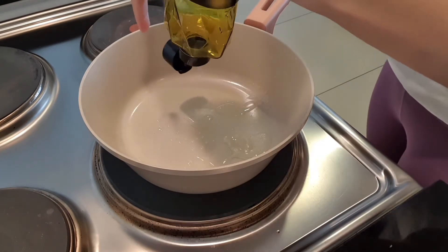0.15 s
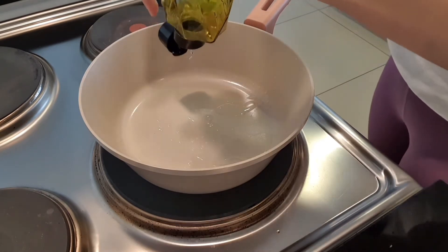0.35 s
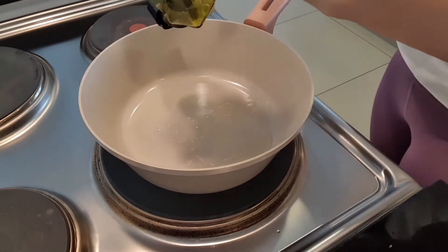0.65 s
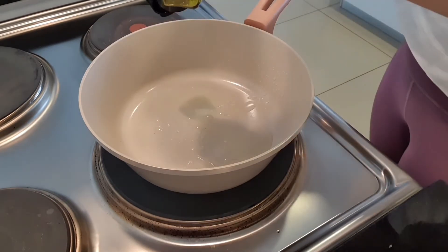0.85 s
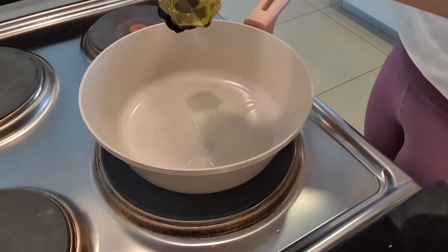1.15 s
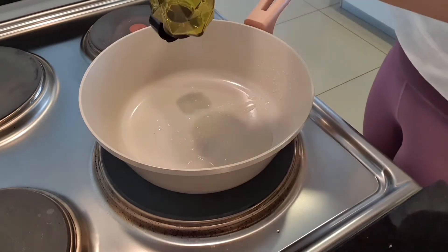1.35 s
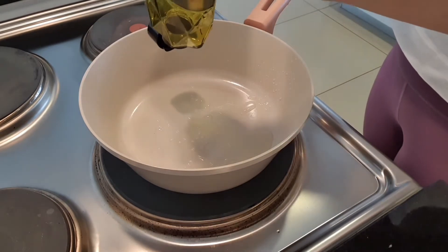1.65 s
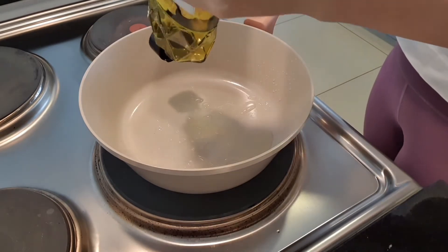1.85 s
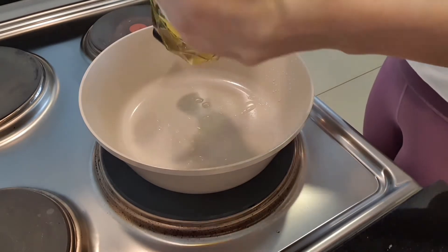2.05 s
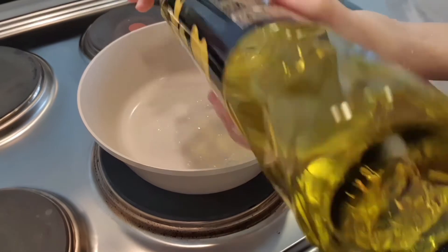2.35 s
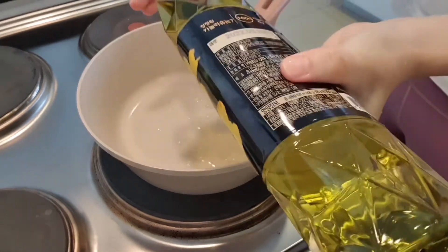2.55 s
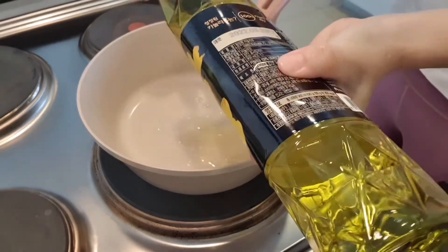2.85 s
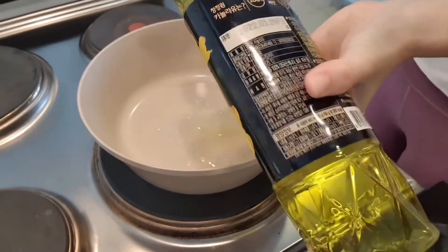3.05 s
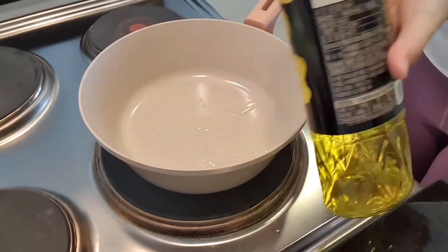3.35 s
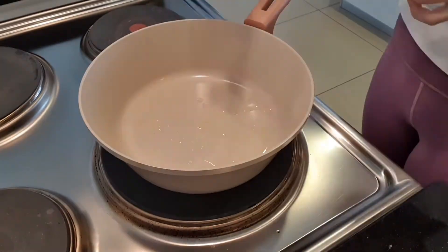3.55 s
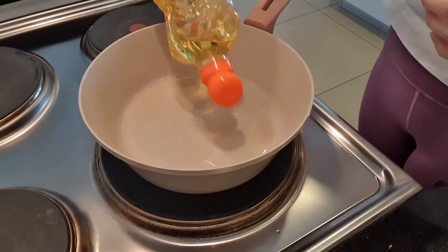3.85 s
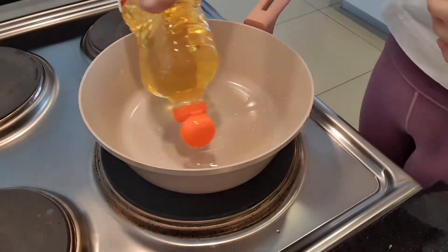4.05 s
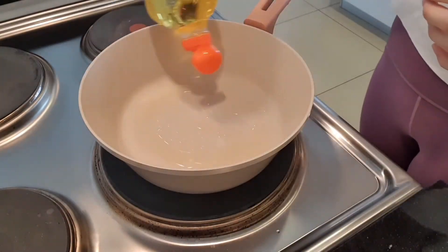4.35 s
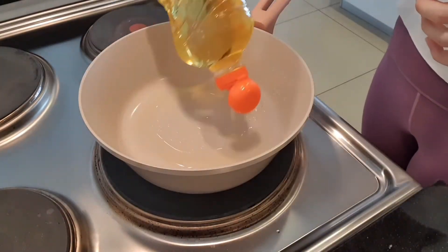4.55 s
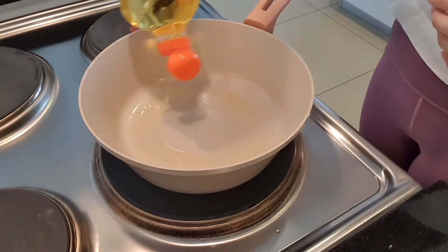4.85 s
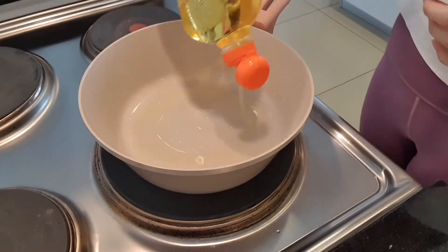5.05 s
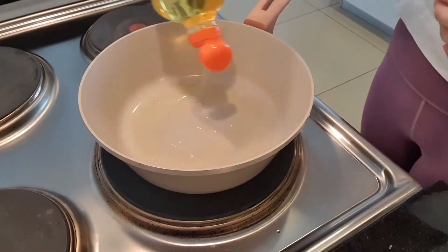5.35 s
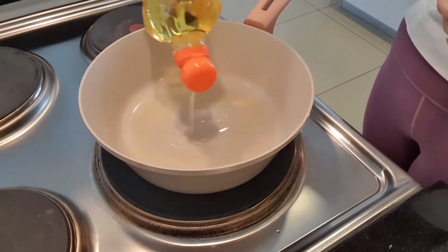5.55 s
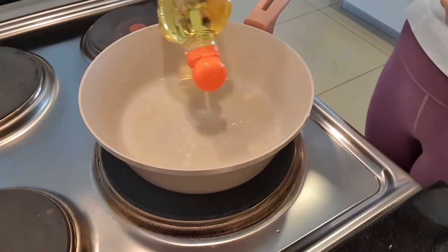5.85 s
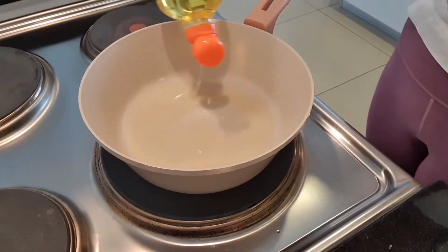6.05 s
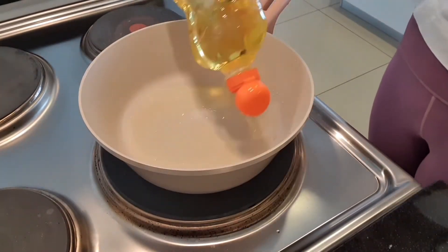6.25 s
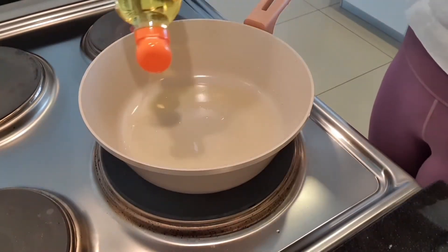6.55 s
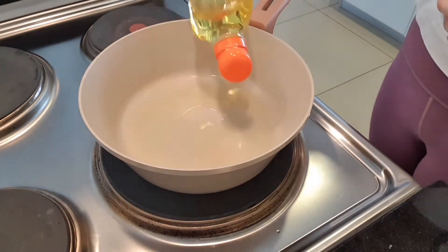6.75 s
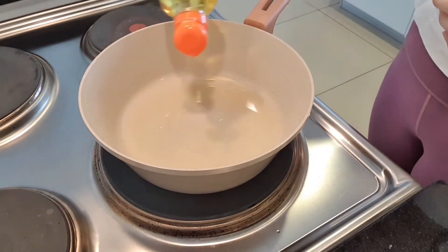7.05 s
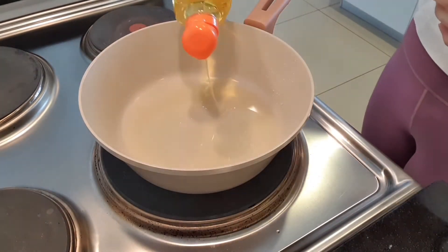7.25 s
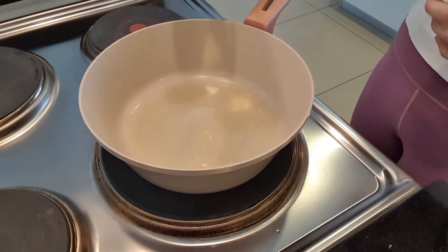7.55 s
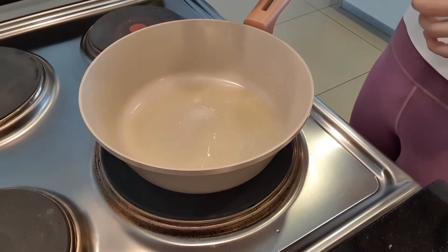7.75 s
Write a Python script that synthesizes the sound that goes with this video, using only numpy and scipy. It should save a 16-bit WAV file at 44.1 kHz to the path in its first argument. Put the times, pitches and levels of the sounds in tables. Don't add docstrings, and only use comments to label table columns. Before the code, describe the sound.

Gritty sliding and heavy wooden knocks with bottle clunks, then a quiet stretch of soft oil glugs and plastic ticks, ending in a short rattle.

```python
import sys
import numpy as np
from scipy import signal
from scipy.fft import rfft, irfft
from scipy.io import wavfile
from scipy.ndimage import uniform_filter1d

SR = 44100
rng = np.random.default_rng(int(sys.argv[2]) if len(sys.argv) > 2 else 0)


def gain_from_db(level_db):
    decades = np.asarray(level_db, float) / 20
    return 10 ** decades


def digitize_waveform(pressure):
    field = np.atleast_2d(pressure).T
    bounded = np.clip(field, -1, 1)
    quanta = np.round(bounded * 32767).astype(np.int16)
    wavfile.write(sys.argv[1], SR, quanta)


N = 348390
T = np.arange(N) / SR


def unit(x):
    return x / np.sqrt(np.mean(x ** 2))


def resonance(size, hz, width_hz):
    f = np.maximum(np.arange(size // 2 + 1) * SR / size, 1)
    return 1 / (1 + 1j * (f - hz ** 2 / f) / width_hz)


def band(x, lo_hz, hi_hz):
    mid, width = np.sqrt(lo_hz * hi_hz), hi_hz - lo_hz
    lower = resonance(len(x), np.sqrt(lo_hz * mid), width)
    upper = resonance(len(x), np.sqrt(hi_hz * mid), width)
    return irfft(rfft(x) * (lower * upper) ** 2, len(x))


def modes(x, table):
    response = 0
    for k, (hz, width_hz, db) in enumerate(table):
        response = response + (-1) ** k * gain_from_db(db) * resonance(len(x), hz, width_hz)
    return irfft(rfft(x) * response, len(x))


def walk(rate_hz):
    k = int(SR / rate_hz)
    held = np.repeat(rng.standard_normal(N // k + 1), k)
    return np.sqrt(2) * uniform_filter1d(uniform_filter1d(held, k), k)[:N]


def notes(table, patchy_db, rate_hz):
    x = rng.standard_normal(N)
    out = np.zeros(N)
    for hz, width_hz, db in table:
        note = unit(signal.lfilter(*signal.iirpeak(hz, hz / width_hz, SR), x))
        out += gain_from_db(db + patchy_db * walk(rate_hz)) * note
    return out


def coloured(points):
    hz, db = np.transpose(points)
    f = np.maximum(np.arange(N // 2 + 1) * SR / N, 1)
    shape = gain_from_db(np.interp(np.log(f), np.log(hz), db))
    return unit(irfft(rfft(rng.standard_normal(N)) * shape, N))


def treble(x):
    bass_leak, spread_hz = 0.045, 240
    high = signal.butter(2, spread_hz, "high", fs=SR, output="sos")
    return bass_leak * x + signal.sosfiltfilt(high, x, padtype=None)


def wide(make, share, left):
    mid = make()
    return mid + treble(share * make() + left * mid) * np.array([[1], [-1]])


def add(out, s, x):
    i = int(s * SR)
    out[i:i + len(x)] += x[:N - i]


def chatter(fade_s):
    size = 4096 if fade_s > 0.009 else 2048
    x = rng.standard_normal(size) * np.exp(-T[:size] / max(fade_s, 1e-4))
    x[0] += 0.59 * np.linalg.norm(x)
    return x


def burst(lo_hz, hi_hz, fade_s, db):
    x = band(chatter(fade_s), lo_hz, hi_hz)
    return gain_from_db(db) * x / np.abs(x).max()


# start_s, level_db
BACKGROUND_LEVEL = [(0, -43.5), (.5, -40.5), (1.1, -45), (1.6, -37), (2.3, -47), (2.8, -46), (3.2, -48),
                    (3.65, -50), (3.7, -47), (4.02, -43), (4.3, -40), (4.7, -43.5), (5.4, -43), (5.9, -46),
                    (6.55, -43), (7.1, -45.5), (7.5, -43), (7.9, -42)]
# pitch_hz, density_db (per Hz)
HUM_COLOUR = [(15, -39.5), (25, -16), (32, -14.5), (48, -1.5), (59, -5), (112, 1.5), (141, -1.5),
              (155, -12), (178, -3), (198, -9.5), (227, -7.5), (282, -39), (320, -49), (420, -37.5),
              (700, -120)]
# pitch_hz, density_db (per Hz)
AIR_COLOUR = [(150, -19), (260, -2), (316, -14), (415, -8.5), (483, -4.5), (621, -6.5), (1130, -14),
              (1330, -14.5), (1800, -18), (2170, -19.5), (3500, -28), (4550, -54), (7700, -120)]
# pitch_hz, density_db (per Hz)
THIN_COLOUR = [(2060, -30), (3500, -1), (3950, -2.5), (4520, -9.5), (5040, -12.5), (6050, -13.5),
               (6550, -13.5), (8780, -16), (9790, -19), (10900, -25.5), (15000, -31.5)]
# pitch_hz, width_hz, level_db
FAN_WHINE = [(4470, 110, 0), (3360, 120, -4), (8930, 160, -19)]


def hum():
    air_db, thin_db, whine_db = -11, -29.5, -38
    low = gain_from_db(0.68 * walk(10)) * wide(lambda: coloured(HUM_COLOUR), 0.4, 0.02)
    air = gain_from_db(air_db + 0.54 * walk(4.3)) * wide(lambda: coloured(AIR_COLOUR), 0.93, 0.024)
    thin = gain_from_db(thin_db + 0.73 * walk(4)) * wide(lambda: coloured(THIN_COLOUR), 0.95, 0.02)
    whine = gain_from_db(whine_db) * wide(lambda: notes(FAN_WHINE, 2.5, 2.9), 0.95, 0.021)
    return gain_from_db(np.interp(T, *np.transpose(BACKGROUND_LEVEL))) * (low + air + thin + whine)


# start_s, peak_db, centre_hz, band_ratio
SPECKS = [(.182, -63, 8800, 1.1), (.247, -28, 4300, 1.25), (.515, -29, 9200, 1.05),
          (.516, -35, 10900, 1.05), (3.015, -33, 2600, 1.2), (1.111, -51, 4800, 1.08),
          (1.164, -57, 3200, 1.2), (1.281, -47, 8500, 1.3), (1.443, -32, 7500, 1.3),
          (2.228, -24, 2000, 1.4), (2.919, -54, 12000, 1.2), (3.138, -58, 7000, 1.3),
          (3.261, -60, 11500, 1.15), (3.395, -66, 8000, 1.05), (4.142, -46, 3300, 1.25),
          (4.302, -44, 3000, 1.08), (4.303, -45, 1550, 1.1), (4.478, -50, 2600, 1.15),
          (4.491, -44, 1080, 1.1), (5.413, -43, 2700, 1.1), (5.53, -33, 230, 1.5), (7.241, -45, 2300, 1.2),
          (7.602, -33, 5000, 1.06), (7.603, -24, 3000, 1.12), (7.638, -32, 4900, 1.06),
          (7.865, -31, 3900, 1.1)]


def specks():
    fade_s, left = 0.005, 0.15
    out = np.zeros(N)
    for s, db, hz, ratio in SPECKS:
        ratio = max(ratio, 1.02)
        add(out, s, burst(hz / ratio, hz * ratio, fade_s, db))
    return out * np.array([[1 + left], [1 - left]])


# start_s, body_peak_db, crack_db, fizz_db
KNOCKS = [(0.246, -11.5, -13.5, -44), (0.691, -32.5, -44, -56), (0.747, 0.5, -15, -32),
          (1.441, -36, -30.5, -27.5), (1.568, -0.5, -32.5, -29.5), (1.604, -16.5, -32.5, -34.5),
          (1.748, -14.5, -26.5, -40.5), (1.766, -20.5, -17.5, -9), (1.935, -5, -7.5, -14.5),
          (2.012, -36.5, -44.5, -36.5), (2.17, -23, -35.5, -42.5), (2.335, -4.5, -21.5, -13.5),
          (3.014, -15.5, -25.5, -40), (7.627, -20, -30.5, -54), (7.865, -25.5, -26, -33)]
# start_s, body_peak_db, crack_db, fizz_db, body_centre_hz
CLUNKS = [(2.205, -9.5, -23, -23.5, 530), (2.227, -13.5, -17, -26, 617), (2.253, -12.5, -12, -14, 530),
          (2.411, -2.5, -12.5, -18.5, 570), (2.481, -10, -10, -7, 550), (2.543, -29, -17, -9.5, 526),
          (5.218, -6, -22, -40, 1620), (7.601, -18.5, -40, -43, 1300), (7.638, -15.5, -41, -38, 490),
          (7.673, -12, -19.5, -27, 596), (7.698, -15.5, -19, -41, 1170)]
# start_s, peak_db, centre_hz
THUDS = [(0.247, -22.5, 113), (0.747, -13.5, 124), (1.567, -24.5, 108), (1.937, -20.5, 138),
         (2.204, -9.5, 173), (2.225, -19, 138), (2.252, -21, 242), (2.334, -19.5, 102), (2.411, -13, 119),
         (2.481, -18, 234), (2.51, -27, 157), (2.54, -27.5, 240), (3.013, -27, 121.5), (4.443, -34, 95),
         (5.212, -31, 149), (5.523, -32, 99), (7.64, -30, 211), (7.684, -40, 156), (7.717, -25.5, 149),
         (7.667, -22, 129), (7.701, -29, 124)]
# start_s, peak_db, centre_hz, fade_s
HOLLOW = [(0.246, -34, 370, 0.0043), (.69, -30, 400, 0.014), (.749, -18, 300, 0.01),
          (.747, -6.5, 1605, 0.012), (1.767, -9, 3220, 0.0069), (7.679, -24.5, 118.3, 0.028),
          (2.841, -32.5, 980, 0.0039), (2.879, -41, 857, 0.0073), (2.915, -32, 775, 0.0017),
          (2.936, -32, 736, 0.0031), (3.016, -26, 494.5, 0.0087), (4.445, -36, 1300, 0.0065),
          (5.223, -26, 523, 0.027), (5.528, -40.5, 785, 0.0071), (6.044, -44.5, 900, 0.0068),
          (6.38, -39, 1620, 0.0089), (7.6, -13.5, 1750, 0.0095), (7.603, -28, 2860, 0.0082),
          (7.698, -13.5, 4200, 0.0021), (4.188, -23.5, 2670, 0.0027), (7.61, -24, 673, 0.043), ]


def knocks():
    panel_hz, thud_fade_s = 775, 0.013
    out = np.zeros(N)
    for s, body_db, crack_db, fizz_db, hz in [(*row, panel_hz) for row in KNOCKS] + CLUNKS:
        add(out, s, burst(hz / 2.18, hz * 1.545, 0.0088, body_db - 3))
        add(out, s, burst(870, 3100, 0.0051, crack_db + 5))
        add(out, s, burst(3000, 6580, 0.0031, fizz_db + 3))
        add(out, s, burst(6600, 13910, 0.0029, fizz_db - 3))
    for s, db, hz in THUDS:
        add(out, s, burst(hz / 4.2, hz * 1.72, thud_fade_s, db))
    for s, db, hz, fade_s in HOLLOW:
        add(out, s, burst(hz / 1.46, hz * 1.27, fade_s, db))
    return out


# start_s, load_db, grit_db
PULLS = [
    [(.3, -59.5, 8), (.325, -48.5, 7.5), (.38, -39, -5), (.45, -34.5, -9.5), (.54, -37, -28),
     (.6, -48.5, -18), (.679, -61.5, -14)],
    [(.684, -54, -18.5), (.693, -42, -21), (.76, -38.5, -15), (.83, -37.5, -18), (.9, -52, -43),
     (1.0, -57, -24)],
    [(1.268, -69.5, -2), (1.284, -56, -6), (1.315, -48, -15.5), (1.36, -40, -12), (1.45, -39.5, -11.5),
     (1.78, -36.5, -5.5), (1.9, -41, -1.5), (2.11, -38, -14), (2.15, -49, -7)],
    [(2.151, -48.5, -7), (2.18, -32.5, -14), (2.3, -40, -9.5), (2.45, -41, -4), (2.5, -34.5, -2.5),
     (2.6, -37.5, 2), (2.74, -50.5, 7), (2.86, -61, 3.5), (2.99, -77, 4)],
    [(7.6, -59, -8), (7.63, -32, -18), (7.7, -34.5, -15), (7.76, -43.5, -24), (7.85, -52, -22),
     (7.875, -39.5, -9), (7.95, -62, -20)],
]
# rail_rattle_db, finest_grit_db, box_db
PULL_COLOUR = [(2.5, 3, 0.5), (1.5, 4, 1.5), (-0.5, 1.5, 0.5), (-4, -2, 0), (-3, -3.5, -3)]
# pitch_hz, width_hz, level_db
RUMBLE = [(380, 44, -5.5), (584, 130, -2.5), (723, 110, 1.5), (1300, 370, -9.5)]
# pitch_hz, width_hz, level_db
RATTLE = [(1700, 130, -4), (2360, 150, -4.5), (2740, 240, -4.5), (3268, 400, -6.5), (4200, 1100, -11.5)]
# pitch_hz, width_hz, level_db
HISS = [(4530, 1400, 1), (5250, 860, 2), (6700, 1600, -2), (7700, 1500, -11)]
# pitch_hz, width_hz, level_db
SHEEN = [(9000, 1200, -2), (11100, 860, -2), (13800, 5500, -8)]
# pitch_hz, width_hz, level_db
RAIL_NOTES = [(785, 68, -6), (1256, 78, -19), (2080, 75, -13), (2533, 34, -15.5), (2950, 45, -20.5),
              (3460, 55, -20.5), (3960, 66, -26.5)]


def runners():
    load_db, grit_db, rattle_db, sheen_db, box_db = np.full((5, N), -120.)
    for rows, colour in zip(PULLS, PULL_COLOUR):
        s, *columns = np.transpose(rows)
        on = (T >= s[0]) & (T <= s[-1])
        load_db[on], grit_db[on] = (np.interp(T[on], s, c) for c in columns)
        rattle_db[on], sheen_db[on], box_db[on] = colour
    grain = gain_from_db(2.8 * np.minimum(rng.exponential(size=N), 3.2) + 2.5 * walk(70))
    grit_patchy_db = 0.8

    def grit(table):
        return unit(modes(rng.standard_normal(N) * grain, table))

    def coarse_grit():
        low = signal.butter(2, 9500, fs=SR, output="sos")
        return signal.sosfilt(low, grit(HISS))

    rumble = gain_from_db(box_db) * wide(lambda: grit(RUMBLE), 0.6, 0.2)
    rattle = gain_from_db(5.5 + rattle_db + 0.63 * grit_db) * wide(lambda: grit(RATTLE), 0.76, 0.15)

    rail_hz, rail_db, rail_fade_db_s = 2070, 6, 9
    turns_hz, first_turn_s = 43, 0.366
    throb = np.sin(np.pi * turns_hz * (T - first_turn_s + 0.001 * walk(20))) ** 2
    tone = np.sin(2 * np.pi * rail_hz * np.cumsum(1 + 0.006 * walk(90)) / SR)
    rattle += gain_from_db(rail_db - rail_fade_db_s * T + walk(12)) * throb * tone
    rattle += gain_from_db(box_db) * wide(lambda: notes(RAIL_NOTES, 4, 12), 0.6, 0.15)

    rise_s, rise_top_db = 0.11, 11
    keep = np.exp(-1 / (rise_s * SR))
    recent_db = signal.lfilter([1 - keep], [1, -keep], load_db + 121)
    rise_db = np.clip(load_db + 119.5 - recent_db, -rise_top_db, rise_top_db)

    fine_db = -5 + 0.36 * rise_db + sheen_db + 0.6 * (load_db + 38) - 0.62 * np.abs(grit_db)
    sheen = gain_from_db(fine_db + grit_patchy_db * walk(22)) * wide(lambda: grit(SHEEN), 1.0, -0.1)
    hiss = gain_from_db(-1.5 + grit_db + grit_patchy_db * walk(7.4)) * wide(coarse_grit, 1.0, 0.0996)
    lag = gain_from_db(-0.22 * np.maximum(rise_db, 0))
    return gain_from_db(load_db) * (rumble + lag * (rattle + hiss) + sheen)


# start_s, slip_rate_hz, level_db, overtone_db
SQUEAK = [
    (0.303, 1640, -43, -44.5),
    (.306, 1720, -33, -19),
    (.312, 2013, -20.5, -21),
    (0.323, 1970, -27.5, -36.5),
    (.34, 1792, -32.5, -29),
    (0.357, 1642, -33.5, -24.5),
    (0.37, 1592, -37, -39),
    (0.399, 1410, -38, -59),
    (.44, 1154, -40, -80.5),
]


def squeak():
    wobble, flutter_db = 0.012, 2.5
    s, hz, first_db, second_db = np.transpose(SQUEAK)
    phase = 2 * np.pi * np.cumsum(np.interp(T, s, hz) * (1 + wobble * walk(400))) / SR
    out = np.zeros(N)
    for k, level_db in ((1, first_db), (2, second_db)):
        level = gain_from_db(np.interp(T, s, level_db, -120, -120) + flutter_db * walk(120))
        out += level * np.sin(k * phase)
    return out


# start_s, body_peak_db, crack_db, snap_db
TAPS = [(0.444, -28, -31, -44), (0.517, -48, -56, -37), (0.72, -40, -46, -47), (1.094, -49, -54, -62),
        (1.111, -62, -59, -65), (2.841, -35.5, -44, -75.5), (2.879, -44, -54, -64),
        (2.915, -39.5, -48, -65), (2.938, -38, -45, -54), (3.172, -48.5, -57, -67),
        (3.199, -50, -56.5, -57), (3.93, -54.5, -62, -62)]
# start_s, body_peak_db, crack_db, snap_db
CRACKLES = [(4.186, -29, -59, -54), (4.219, -48, -42.5, -57), (4.269, -51, -56, -56),
            (4.303, -46, -54.5, -67.5), (4.492, -39, -53, -51), (4.56, -38.5, -67.5, -74),
            (4.687, -53, -46.5, -48.5), (5.404, -36.5, -49, -50), (5.414, -32, -49, -55),
            (5.553, -59, -66.5, -56.5), (5.754, -54.5, -56, -66.5), (5.781, -79, -58, -50),
            (5.83, -43, -48.5, -46), (5.986, -68.5, -53.5, -48.5), (6.121, -49, -52.5, -59),
            (6.165, -59, -51, -61), (6.209, -36.5, -54, -54.5), (6.372, -46, -52, -50.5),
            (6.39, -35.5, -52, -62.5), (6.609, -52, -53, -60), (6.634, -30, -46.5, -57),
            (6.78, -51.5, -41.5, -47.5), (6.789, -55, -47, -50), (7.239, -41.5, -50, -70),
            (7.254, -41, -47.5, -56.5), (7.335, -49.5, -47.5, -58), (7.362, -34, -61, -62),
            (7.398, -47, -56, -69), (7.433, -42.5, -63, -75)]
# pitch_hz, width_hz, level_db
PAN_RING = [(6480, 750, 5), (4100, 200, -3.5), (8700, 1400, -2)]


def ticks():
    fade_s = 0.008
    out, snaps = np.zeros((2, N))
    for s, body_db, crack_db, snap_db in TAPS + CRACKLES:
        add(out, s, burst(540, 2240, fade_s, body_db))
        add(out, s, burst(1980, 5550, fade_s, crack_db + 4))
        add(snaps, s, burst(3830, 11740, fade_s, snap_db + 2.5))
    return out + 0.52 * snaps + gain_from_db(4.5) * modes(snaps, PAN_RING)


# start_s, peak_db, centre_hz, band_ratio
CLATTER = [(7.614, -25, 1700, 1.5), (7.628, -24, 1600, 1.07), (7.63, -33, 2900, 1.08),
           (7.647, -31, 6700, 1.08), (7.653, -28, 1450, 1.23), (7.664, -30, 3000, 1.1),
           (7.667, -18, 804, 2.5), (7.675, -25.5, 3840, 1.1), (7.684, -19, 1390, 1.17),
           (7.703, -19.5, 1300, 1.25), (7.716, -24.5, 1350, 1.34), (7.864, -22, 2700, 1.15),
           (7.865, -33, 7200, 1.4), (5.219, -21, 2500, 1.23), (.747, -19.5, 11000, 2.2),
           (1.408, -26.5, 2060, 1.4), (1.525, -41, 4200, 1.1), (1.525, -31, 2860, 1.06),
           (1.6865, -33.5, 11300, 1.5), (1.7348, -28, 9000, 1.3), (1.9977, -30, 10600, 1.3),
           (2.0155, -20, 10100, 1.2), (3.014, -33.5, 9000, 1.55), (3.21, -54, 2816, 1.25),
           (3.395, -69.5, 9000, 1.26), (3.69, -52, 3503, 1.6), (5.218, -41.5, 8300, 1.1),
           (5.41, -39, 4100, 1.11), (5.218, -5, 1355, 1.3), (1.6035, -17, 9860, 1.39),
           (7.638, -25, 2000, 1.05), (7.638, -32, 5960, 1.1), (0.718, -25, 3080, 2.3),
           (2.412, -14.5, 1300, 1.085), (1.935, -10, 1114, 1.37), (4.19, -48, 12400, 1.3),
           (4.687, -50, 11800, 1.1), (7.35, -49, 10500, 1.2)]


def clatter():
    fade_s = 0.0036
    out = np.zeros(N)
    for s, db, hz, ratio in CLATTER:
        ratio = max(ratio, 1.02)
        add(out, s, burst(hz / ratio, min(hz * ratio, 0.45 * SR), fade_s, db))
    return out


# start_s, pitch_hz, peak_db, length_s
BLIPS = [(4.08, 687, -43, .036), (4.19, 2170, -45, .028), (4.242, 2160, -46, .026),
         (4.388, 2390, -52, .034), (4.408, 1720, -50, .014), (4.452, 420, -34, .042),
         (4.534, 520, -43, .014), (5.508, 2650, -55, .022), (5.566, 4000, -57, .016),
         (7.458, 1760, -42, .016)]


def blips():
    glide, flutter_db = 0.04, 4
    out = np.zeros(N)
    for s, hz, db, length_s in BLIPS:
        age = np.minimum(T[:4096] / length_s, 1)
        phase = 2 * np.pi * hz * np.cumsum(1 + glide * (age - 0.5)) / SR
        add(out, s, gain_from_db(db) * np.sin(np.pi * age ** 0.65) * np.sin(phase))
    return out * gain_from_db(flutter_db * walk(150))


# start_s, pitch_hz, peak_db
GLUGS = [(4.131, 992, -25), (4.132, 251, -24.5), (4.139, 1370, -34.5), (4.156, 541, -25), (4.158, 380, -27),
         (4.181, 292, -33), (4.2, 508, -39), (4.221, 1176, -39), (4.228, 1330, -44), (4.225, 687, -36),
         (4.266, 924, -43), (4.444, 412, -31), (4.448, 600, -34.5), (4.48, 480, -47), (4.548, 1500, -47),
         (4.6, 3730, -56), (5.527, 480, -40.5), (6.02, 464, -46), (6.368, 424, -36.5), (7.332, 5070, -54)]


def glugs():
    life_s, cycles = 0.018, 3.8
    glide, rough = 0.051, 0.64
    out = np.zeros(N)
    wobble = walk(200)
    for s, hz, db in GLUGS:
        age = T[:4096] / (life_s + cycles / hz)
        shake = wobble[int(s * SR):][:len(age)]
        pitch = 1 + glide * (np.minimum(age, 2) - 0.5) + 0.036 * shake
        phase = 2 * np.pi * hz * np.cumsum(pitch) / SR
        splat = unit(band(rng.standard_normal(len(age)), hz / 1.32, hz * 1.32))
        add(out, s, gain_from_db(db + 16.5) * age * np.exp(-3.8 * age) * (np.sin(phase) + rough * splat))
    return out


def even(x, share):
    spectrum = rfft(x)
    size = np.abs(spectrum) + 1e-12
    smooth = uniform_filter1d(size, size=len(size) // 60)
    return irfft(spectrum * (smooth / size) ** np.clip(share, 0, 1), len(x))


# low_hz, high_hz, level_db, t60_s
ROOM = [(50, 343, -18.5, 0.54), (229, 1300, -20.5, 0.68), (900, 3700, -18, 1), (2620, 8900, -11, 0.77),
        (6500, 18000, -7.5, 0.46)]


def kitchen(x, wet_db, left):
    t = T[:SR // 2]

    def tail():
        out = np.zeros(len(t))
        for lo_hz, hi_hz, db, t60_s in ROOM:
            noise = unit(band(rng.standard_normal(len(t)), lo_hz, hi_hz))
            out += gain_from_db(db - 60 * t / t60_s) * noise
        return gain_from_db(wet_db) * even(np.clip(t / 0.0075, 0, 1) * out, 0.87) * np.exp(-t / 0.17)

    mid, side = tail(), tail()
    close = even(rng.standard_normal(512) * np.exp(-T[:512] / 0.0018), 0.8)
    mid[1] = 1
    add(side, 0.0012, 0.61 * close / np.linalg.norm(close))
    high = signal.butter(1, 6480, "high", fs=SR, output="sos")
    top = 0.19 * signal.sosfilt(high, mid)
    side[:3] += 0.34 * np.array([1, 0, -1])
    side = side + left * mid - top
    mid, side = (signal.fftconvolve(x, path)[:N] for path in (mid, side))
    return mid + treble(side) * np.array([[1], [-1]])


def scene():
    cabinet = kitchen(knocks() + clatter() + squeak(), -31.5, 0.22) + runners()
    bottle = kitchen(ticks() + glugs(), -31.0, 0.052)
    return cabinet + bottle + hum() + specks() + blips()


def top_cut(x):
    return signal.sosfilt(signal.butter(12, 16990, fs=SR, output="sos"), x)


# pitch_hz, level_db
RANGE_ENDS = [(20, -3), (45, 0), (15700, 0), (15900, -44), (16850, -44), (17000, -90)]


def record(dry):
    hz, db = np.transpose(RANGE_ENDS)
    colour = gain_from_db(np.interp(np.arange(N // 2 + 1) * SR / N, hz, db))
    rounded = np.tanh(0.91 * dry) / 0.89
    mix = irfft(rfft(rounded) * colour, N)
    return top_cut(mix)


dry = scene()
out = record(dry)
digitize_waveform(out)
```